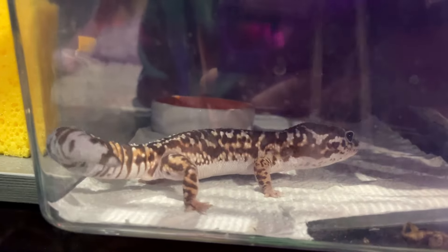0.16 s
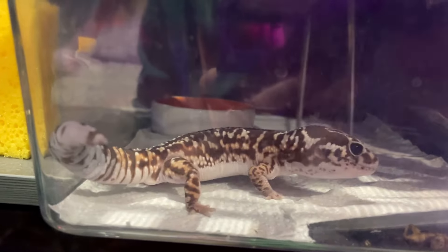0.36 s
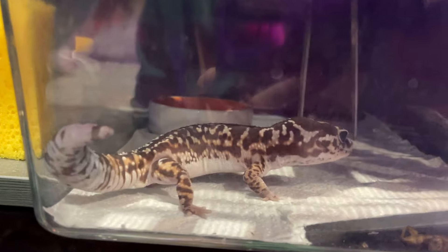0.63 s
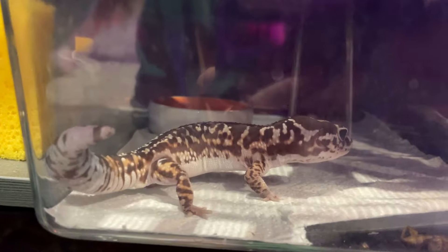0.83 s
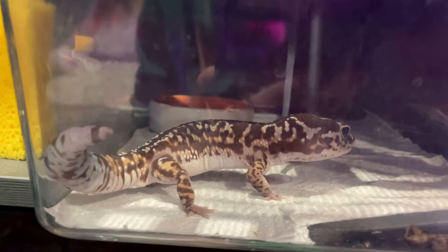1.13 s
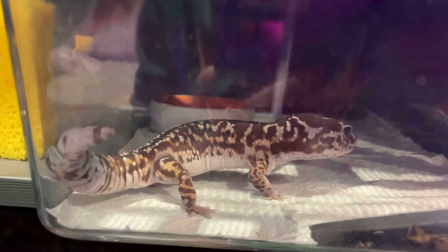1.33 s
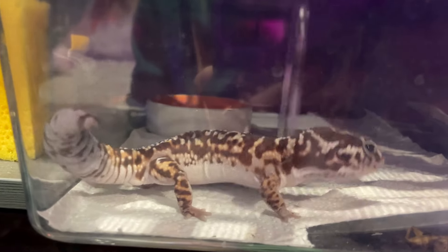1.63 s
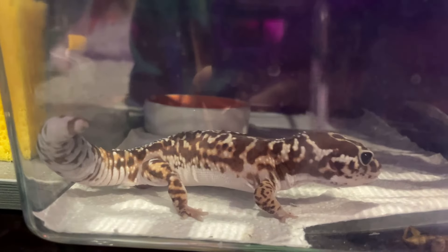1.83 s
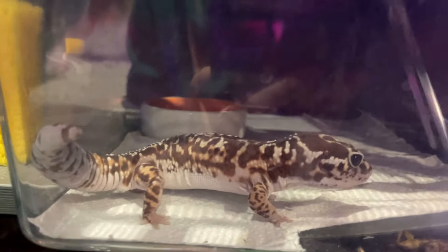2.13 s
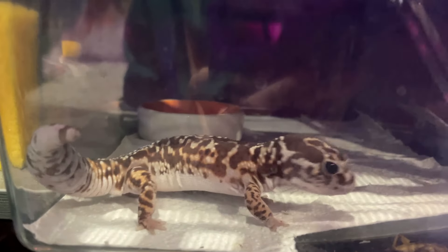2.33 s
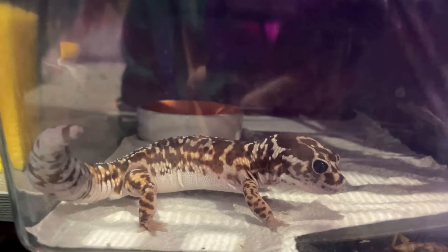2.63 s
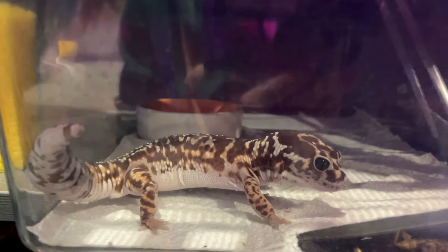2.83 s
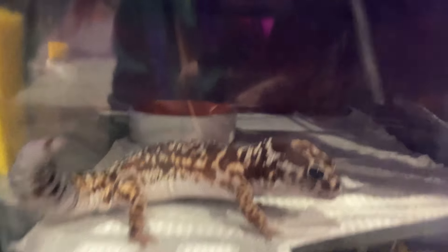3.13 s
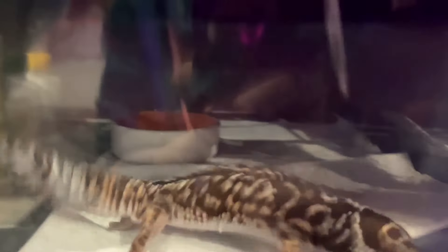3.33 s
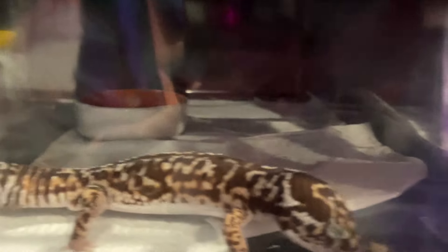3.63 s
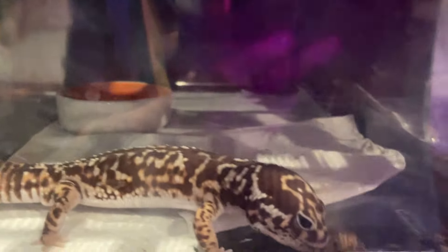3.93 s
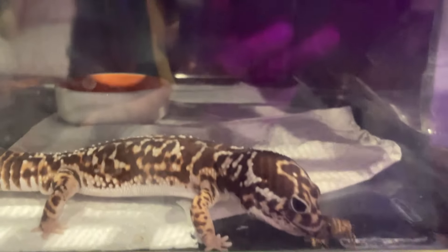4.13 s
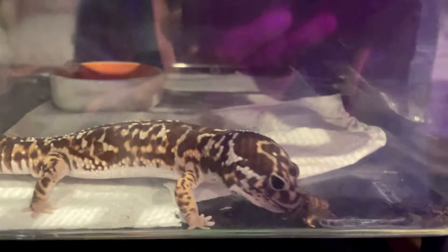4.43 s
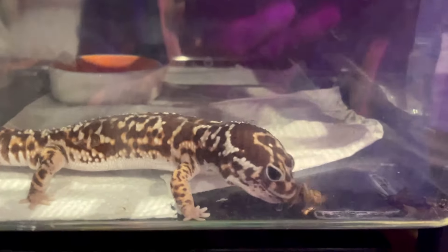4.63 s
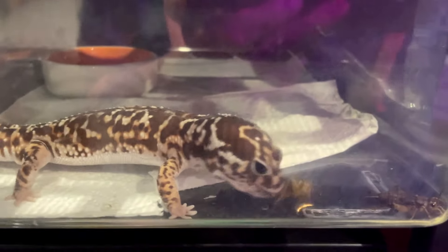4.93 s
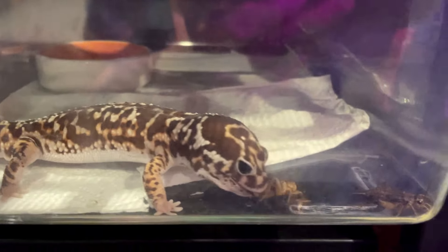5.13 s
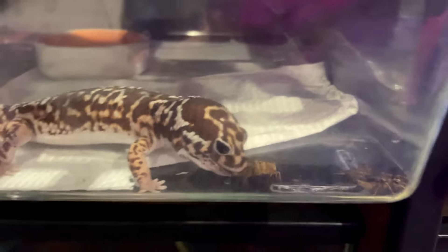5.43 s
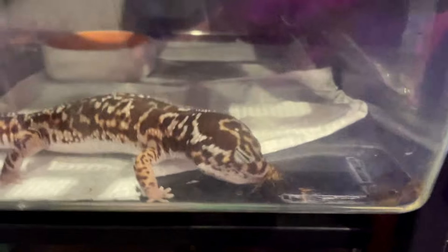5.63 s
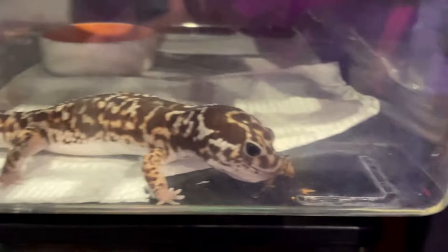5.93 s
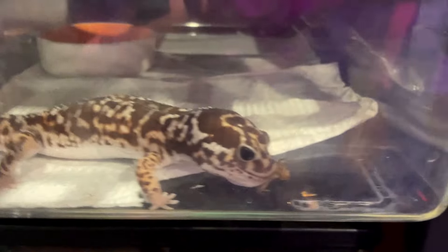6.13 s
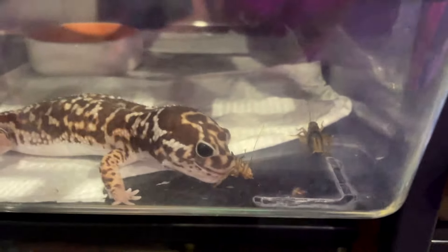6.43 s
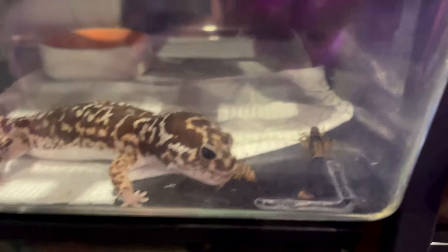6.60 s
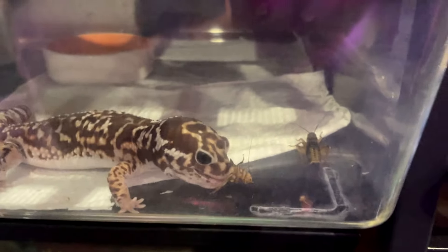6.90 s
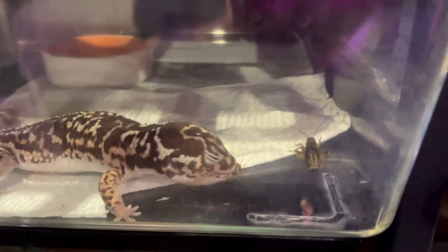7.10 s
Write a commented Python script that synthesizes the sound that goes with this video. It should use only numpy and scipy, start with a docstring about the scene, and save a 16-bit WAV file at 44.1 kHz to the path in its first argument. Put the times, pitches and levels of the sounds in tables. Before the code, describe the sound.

Scattered hollow knocks on a glass tank, light ticks and soft paper towel rustling as a lizard snaps at insects.

```python
"""A gecko stalks and snaps up crickets in a small glass tank, close to a stereo microphone.
Knocks, two of them the gecko's strikes, flex the walls, which boom, ring and judder; claws, jaws and
cricket legs tick on the floor. Feet and belly rustle the paper towel lining; something slides softly.
Behind the tank lies a quiet room: low rumble, faint mains hum and a thin, far whine."""
import sys
import numpy as np
from scipy import signal
from scipy.fft import rfft, irfft, next_fast_len
from scipy.io import wavfile

SR = 44100
rng = np.random.default_rng(int(sys.argv[2]) if len(sys.argv) > 2 else 0)


def put_to_file(sound):
    """Save the sound as 16-bit audio at rate SR, in the file named by the first command-line argument."""
    columns = np.atleast_2d(sound).T  # one column per channel
    safe = np.clip(columns, -1, 1)
    whole_steps = np.round(safe * 32767)
    wavfile.write(sys.argv[1], SR, whole_steps.astype(np.int16))


N = 320166

# room tone behind the tank: f/Hz, relative density/dB
ROOM_TONE = [(12, -45), (20, -32.5), (48, -3.5), (101, -2), (163, -14), (198, -8), (277, -18.5),
             (485, -27.5), (825, -36), (1090, -34.5), (1330, -42), (2990, -45.5), (8640, -57),
             (12800, -44.5), (16000, -75)]
# likeness of the room tone in left and right: f/Hz, correlation
ROOM_TONE_LIKENESS = [(60, 0.83), (150, 0.71), (300, 0.35), (650, -0.15), (3000, -0.44), (7000, -0.16),
                      (12000, 0.34)]
# mains hum: f/Hz, level/dB
MAINS_HUM = [(100, -53), (200, -69.5), (250, -62)]
# reverberation of the room: f/Hz, t60/s
ROOM_DECAY = [(100, 0.32), (500, 0.2), (2000, 0.13), (6000, 0.039), (14000, 0.036)]
# the tank at the microphone's two ports: f/Hz, left lead/rad, left minus right/dB
MIC_IMAGE = [(60, 0, 2.3), (250, .25, 1.8), (600, .45, 2.6), (1300, -.4, 4), (2200, .7, 5.5),
             (4800, .9, 4.5), (6000, -1.4, 2), (8600, -3.1, 0), (11500, -4.8, 0), (13000, -6.1, 0)]
# treble colour of the ports: f/Hz, gain/dB
MIC_COLOUR = [(4000, -0.5), (5600, -3), (7200, 1.5), (8600, -0.5), (10300, 3.5), (12500, -2), (14000, -3),
              (16000, -15.5)]
# dull rubs: middle t/s, length/s, centre f/Hz, level/dB
RUBS = [(0.152, 0.32, 1750, -70), (0.605, 0.21, 1640, -70), (0.588, 0.11, 740, -63.5),
        (1.531, 0.077, 826, -55.5), (1.616, 0.12, 1540, -53), (1.69, 0.47, 324, -52),
        (1.927, 0.13, 520, -57.5), (2.346, 0.044, 1070, -58), (2.698, 0.053, 606, -57)]
# feet, belly and insect shell on paper: peak t/s, length/s, crinkle level/dB, fizz level/dB
PAPER_STROKES = [(0.074, 0.14, -75.5, -69), (0.334, 0.16, -67, -59), (0.592, 0.66, -77, -68),
                 (1.211, 0.047, -70, -60.5), (1.282, 0.047, -95, -59), (1.377, 0.059, -90, -60),
                 (1.579, 0.095, -57.5, -47), (1.616, 0.082, -66, -59), (1.746, 0.2, -79, -62.5),
                 (2.056, 0.077, -76, -57.5), (2.295, 0.14, -75, -56.5), (2.423, 0.11, -70.5, -63),
                 (3.408, 0.1, -43, -39), (3.558, 0.24, -61.5, -57.5), (4.008, 0.04, -61.5, -60.5),
                 (4.04, 0.19, -78, -67), (4.339, 0.85, -80.5, -69.5), (5.507, 0.093, -58, -53.5),
                 (5.604, 0.098, -44, -44), (5.686, 0.45, -58, -53.5), (5.85, 0.3, -65, -63),
                 (5.996, 0.04, -60, -46), (6.032, 0.14, -48.5, -52), (6.127, 0.34, -54, -51.5),
                 (6.318, 0.28, -57, -54), (6.5, 0.29, -71.5, -62.5), (6.838, 0.28, -76, -63.5),
                 (7.221, 0.38, -73.5, -65.5)]
# hiss of the slide before the hardest knock: f/Hz, relative density/dB
SCRAPE_HISS = [(300, -13.5), (800, 3.5), (1150, 0.5), (1450, -15), (1900, -6), (2900, -14.5), (4250, -4.5),
               (5500, -15.5), (8600, -15.5), (10600, -5.5), (14500, -7.5)]
# squeaks within the slide: t/s, length/s, top f/Hz, level/dB
SCRAPE_SQUEAKS = [(3.102, .15, 386.3, -46), (3.22, .085, 543.4, -52.5)]
# something small hits the glass: t/s, level/dB
PING_HITS = [(6.0245, -27.5), (6.029, -35.5)]
# the modes it rings: f/Hz, level/dB, t60/s
PING_MODES = [(1700, -3, 0.05), (1985, -3, 0.16), (1850, -8, 0.05), (3050, -9, .04)]
# short dry resonant bursts, the clack of the knocks and a few separate light taps:
# t/s, level/dB, centre f/Hz, top f/Hz, decay/s, sharpness of the resonance
RESONANT_BURSTS = [(0.2695, -38, 850, 1300, 0.0092, 3), (0.274, -45.5, 1850, 3000, 0.014, 2.2),
                   (0.8735, -24.5, 720, 3180, 0.0066, 3), (0.947, -49.5, 1190, 2360, 0.0096, 1.9),
                   (1.613, -50, 2830, 5960, 0.012, 1.5), (2.211, -40.5, 3200, 3900, 0.0044, 1.5),
                   (2.399, -49.5, 597, 2400, 0.024, 1.7), (3.381, -14.5, 730, 3700, .013, 10),
                   (3.3804, -22, 1900, 3803, .005, 1.5), (3.598, -33, 850, 1250, .014, 3),
                   (3.984, -43.5, 1350, 3600, 0.0044, 7.9), (3.984, -53, 3080, 3680, 0.0044, 3.5),
                   (3.995, -50, 2300, 3700, 0.019, 1.1), (4.005, -53.5, 3200, 3750, 0.0096, 3),
                   (4.379, -45.5, 1180, 4050, 0.0035, 1.6), (6.083, -39, 979, 3400, 0.014, 8.5),
                   (6.083, -36.5, 2800, 3600, 0.0036, 2.5), (6.258, -34, 4196, 5670, 0.011, 2),
                   (6.259, -39, 1100, 2400, 0.021, 1.5), (6.333, -37.5, 950, 2190, 0.01, 1.3)]
# claws, jaws and cricket legs: t/s, length/s, level/dB, brightness/dB per band
CLAW_TICKS = [(0.334, .006, -72, 12), (0.705, .004, -73.5, 6.5), (1.171, 0.028, -61.5, -5),
              (1.434, .02, -71.5, -4), (2.763, .014, -80.5, -18.5), (3.426, .005, -39.5, -3.5),
              (3.499, .006, -57, -0.5), (4.707, .002, -78, 18), (5.472, .005, -62.5, 9.5),
              (5.641, .006, -52, -2.5), (5.769, .012, -58.5, 10.5), (5.805, .016, -54.5, 13.5),
              (5.8876, .005, -52, 8.5), (5.959, .008, -55, 2.5), (6.014, .014, -40, 3),
              (6.0835, .002, -43.5, 2), (6.238, .008, -58.5, 12.5), (6.256, .01, -38, 0),
              (6.332, .008, -57, 7.5), (6.384, .006, -62, 6.5), (7.129, .01, -69, 3)]
# colour common to all ticks: level/dB in clack, snap and fizz
TICK_BANDS_DB = [-4, 0.5, 3.5]
# something judders along the tank after a knock: t/s, length/s, level/dB, slip rate/Hz
JUDDER_RUNS = [(2.244, .034, -25, 200), (2.278, 0.061, -23, 216), (2.352, .048, -32, 150),
               (2.403, 0.06, -36, 200)]
# modes rattled by each slip: f/Hz, level/dB, t60/s
RATTLE_MODES = [(313, 0.5, 0.063), (543, -7, 0.044), (777, -9, 0.008), (1123, -14, 0.039),
                (1510, -25, 0.017), (1870, -23.5, 0.025), (2250, -25.5, 0.032), (3200, -27, 0.023)]
# modes of the glass tank: f/Hz, level/dB, t60/s
TANK_MODES = [(103, -15.5, 0.37), (139.3, -2.5, 0.37), (188.5, -8.5, 0.25), (228, -10, .2), (266, -7, 0.14),
              (304.5, -4.5, 0.12), (354.5, -6, 0.15), (453.5, -9, 0.26), (516.3, -7, 0.17),
              (639.4, -14.5, 0.16), (720, -2.5, 0.12), (770, -13.5, 0.05), (853, -16, 0.13),
              (936, -10, 0.19), (1127, -6.5, 0.14), (1227, -10, 0.17), (1456, -11, 0.097),
              (1612, -18, 0.087), (1663, -17.5, 0.13), (1855, -14, 0.29), (2000, -16.5, .11),
              (2120, -16, 0.08), (2695, -22, 0.07), (3100, -23, 0.097)]
# dense ringing of the tank: f/Hz, t60/s
CLATTER_DECAY = [(100, 0.66), (400, 0.19), (1500, 0.078), (4000, 0.023), (12000, 0.055)]
# knocks on the tank: t/s, level/dB, brightness/dB per band, fizz level/dB, thump f/Hz, slap f/Hz, # thump
# delay/s, ring length factor, ring level/dB
WALL_KNOCKS = [(0.2712, -35.3, -10.5, -81, 216.4, 331, 0.0014, 0.66, 0),
               (0.313, -45.5, -15, -79, 148, 324, 0.0076, 0.2, -3),
               (0.8726, -25, -9, -50, 213.5, 313.5, 0.0085, 0.55, -5),
               (0.945, -44.5, -13, -75, 145, 480, 0.014, 0.65, 0),
               (1.63, -52.5, -9.5, -61, 207, 325, 0.0015, 0.62, -8),
               (2.2135, -29.3, -10, -63, 206, 715, 0.008, 1.0, -15),
               (2.396, -49, -17, -74, 196, 623, 0.00548, 0.54, -2.5),
               (2.975, -46.5, -9.5, -90, 262, 506, 0.0045, 0.71, -3),
               (3.308, -39, -11.5, -80, 175, 574, 0.014, 1.5, -3.5),
               (3.379, -15.5, -3.5, -42.5, 269.9, 498, 0.0011, 0.56, -2),
               (3.598, -35, -8, -88, 139.7, 540, 0.01794, 0.86, -3.5),
               (3.842, -61.5, -14.5, -71.5, 156.8, 430, 0.0037, 1.35, -7.5),
               (5.591, -30, -12, -43, 146, 283, 0.0012, 0.67, -3.5),
               (6.257, -46.5, -2.5, -44, 165, 530, 0.0017, 1.13, -5),
               (6.321, -50.5, -1, -63, 254, 694, 0.0036, 1.26, -2.5)]
# colour common to all knocks: level/dB in bass, body, clack and snap
KNOCK_BANDS_DB = [-0.5, 1, -3, -10.5]
# crossovers between bass, body, clack, snap and fizz: f/Hz
CROSSOVERS_HZ = (250, 800, 2500, 7000)


def amp(db):
    """Decibels to gain."""
    return np.exp(np.asarray(db) * (np.log(10) / 20))


def unit(x):
    """Scales to rms 1."""
    return x / np.sqrt(np.mean(x ** 2) + 1e-24)


def read(points, hz, column=1):
    """Reads one column of a table over log frequency."""
    table = np.transpose(points)
    return np.interp(np.log(hz + 1), np.log(table[0] + 1), table[column])


def add(mix, s, sound):
    """Adds a sound to the mix at time s."""
    part = mix[..., max(round(s * SR), 0):][..., :sound.shape[-1]]
    part += sound[..., :part.shape[-1]]


def shaped(x, gain):
    """Filters by a gain given as a function of frequency."""
    size = x.shape[-1]
    padded = next_fast_len(size + 2048)
    return irfft(rfft(x, padded) * gain(np.fft.rfftfreq(padded, 1 / SR)), padded)[..., :size]


def rolloff(f, edge_hz, order):
    """Gain of 1 at zero that falls to a half at edge_hz."""
    return 1 / (1 + (f / edge_hz) ** order)


def resonance(f, hz, sharpness):
    """Gain of one peak, symmetric in log frequency."""
    return 1 / (1 + (sharpness * np.log((f + 1) / hz)) ** 2)


def bands(x):
    """Splits into bass, body, clack, snap and fizz, which sum to the whole."""
    below = [shaped(x, lambda f: rolloff(f, edge, 8)) for edge in CROSSOVERS_HZ]
    return np.diff([0 * x] + below + [x], axis=0)


def tilted(shape_db, db, brightness_db):
    """Band levels of a blow: harder contact tips them towards the treble, about the second band."""
    return db + np.array(shape_db) + brightness_db * (np.arange(len(shape_db)) - 1)


def voiced(x, band_db, size):
    """Colours a blow: sets the levels of the topmost bands over the first size samples, drops the rest."""
    parts = bands(x)[-len(band_db):]
    return sum(amp(db) * part / np.sqrt(np.mean(part[:, :size] ** 2) + 1e-24)
               for db, part in zip(band_db, parts))


def mic_noise(size, apart):
    """Noise at the two microphone ports: a shared part and some of their own."""
    noise = rng.standard_normal((3, size))
    return unit(noise[0] + apart * noise[1:])


def drift(size, rate_hz):
    """Random wander of rms 1."""
    return unit(shaped(rng.standard_normal(size), lambda f: rolloff(f, rate_hz, 4)))


def dying(noise, t60s):
    """Lets each frequency of a noise die at its own speed."""
    hz, t, spectrum = signal.stft(noise, SR, nperseg=256)
    fade = amp(-60 * t / read(t60s, hz)[:, None])
    return signal.istft(spectrum * fade, SR, nperseg=256)[1][..., :noise.shape[-1]]


def ringing(modes, t, spread_db, stretch=1, lag_s=0, detune=0):
    """Damped modes, weighted and detuned at random as the place of a blow would do."""
    hz, db, t60 = np.transpose(modes)[:, :, None]
    strength, shift = rng.standard_normal((len(hz), 2)).T[:, :, None]
    hz = hz * (1 + detune * shift * hz / (hz + 300))
    age = np.maximum(t - lag_s * np.sqrt(100 / hz), 0)  # slow bending waves bring low modes late
    weight = amp(db + spread_db * strength) * (-1) ** np.arange(len(hz))[:, None]
    return (weight * amp(-60 * age / (t60 * stretch)) * np.sin(2 * np.pi * hz * age)).sum(0)


def fibres(size, grain_db=1.0, clump_db=2.0):
    """Friction noise: countless tiny slips that come in clumps."""
    noise = mic_noise(size, apart=0.051)
    return noise * amp(grain_db * drift(size, rate_hz=590) + clump_db * drift(size, rate_hz=41))


def room_tone(air_db=-48.5, lumpy_db=2.0, swell_db=12.5, swell_s=2.7, waver_db=2.5):
    """Behind the tank: lumpy rumble, even hiss, mains hum and a far whine that swells, then holds."""
    t = np.arange(N) / SR
    left, spare = rng.standard_normal((2, N))
    likeness = lambda f: read(ROOM_TONE_LIKENESS, f)
    right = shaped(left, likeness) + shaped(spare, lambda f: np.sqrt(1 - likeness(f) ** 2))
    colour = lambda f: amp(read(ROOM_TONE, f)) / np.sqrt(1.4 + likeness(f))
    air = amp(air_db) * unit(shaped(np.array([left, right]), colour))
    rumble = shaped(air, lambda f: rolloff(f, 300, 4))
    air += rumble * (amp(lumpy_db * drift(N, rate_hz=8.4)) - 1)
    hum = sum(amp(db) * np.sin(2 * np.pi * (hz * t + rng.random())) for hz, db in MAINS_HUM)
    whine = unit(shaped(rng.standard_normal((2, N)), lambda f: rolloff(f - 1085, 28, 2)))
    whine_db = -72 - swell_db * np.maximum(1 - t / swell_s, 0) + waver_db * drift(N, rate_hz=2.5)
    return (air + hum + whine * amp(whine_db)) * amp([[1], [-1]])  # a little to the left


def room_tail(x, wet_db=-17, build_s=0.0097):
    """Diffuse reverberation, weak this close to the tank and different at each port."""
    t = np.arange(SR // 2) / SR
    tail = dying(mic_noise(len(t), apart=1.0), ROOM_DECAY) * (1 - np.exp(-(t / build_s) ** 2))
    return amp(wet_db) * signal.fftconvolve(x, tail / np.linalg.norm(tail[0]), axes=1)[:, :N]


def microphone(x):
    """The two ports colour the treble and hear the tank with different phase and strength."""
    def gain(hz):
        lead, balance_db = read(MIC_IMAGE, hz), read(MIC_IMAGE, hz, column=2)
        balance = amp([balance_db / 2, -balance_db / 2])
        strength = balance / np.sqrt(np.mean(balance ** 2, 0)) * amp(read(MIC_COLOUR, hz))
        return strength * np.exp(-1j * np.array([0 * lead, lead]))
    return shaped(x, gain)


def shuffles(sharpness=2.4):
    """Soft rubs swell and fade, each in one broad resonance."""
    out = np.zeros((2, N))
    for s, length, hz, db in RUBS:
        size = int(length * SR)
        rub = shaped(fibres(size), lambda f: resonance(f, hz, sharpness) ** 1.09)
        add(out, s - length / 2, amp(db) * unit(rub) * np.hanning(size))
    return out


def paper_rustle(stir_db=-84, crackle_db=9, crackles_per_s=130, rise_share=0.65, fade_db=23):
    """Strokes over the paper swell and fade above a faint stir: crinkle, stray crackles, fine fizz."""
    t = np.arange(N) / SR
    impulses = amp(crackle_db) * rng.standard_normal(N) * (rng.random(N) < crackles_per_s / SR)
    crackles = signal.fftconvolve(impulses, rng.standard_normal(128) * np.exp(-t[:128] / 0.0004))[:N]
    paper = shaped(fibres(N) + crackles, lambda f: rolloff(f, 14300, 24))
    _, body, clack, snap, fizz = map(unit, bands(paper))
    crinkle = amp(-6) * body + amp(-2) * clack + snap
    power = np.full((2, N), amp(stir_db) ** 2)
    for s, length, crinkle_db, fizz_db in PAPER_STROKES:
        from_peak = np.maximum((s - t) / rise_share, t - s) / length
        power += (amp([[crinkle_db], [fizz_db]]) * amp(-fade_db * np.minimum(from_peak, 10))) ** 2
    crinkle_level, fizz_level = np.sqrt(power)
    return crinkle_level * crinkle + fizz_level * fizz


def scrape(start_s=3.05, length_s=0.35, edge_s=0.079, level_db=-59, whistle_hz=4260, pitch_arch=0.21):
    """A light slide hisses, whistles softly and squeaks faintly where it catches."""
    out, t = np.zeros((2, N)), np.arange(0, length_s, 1 / SR)
    hiss = unit(shaped(fibres(N)[:, :len(t)], lambda f: amp(read(SCRAPE_HISS, f))))
    whistle = unit(shaped(mic_noise(len(t), apart=0.4), lambda f: rolloff(f - whistle_hz, 190, 2)))
    edges = np.minimum(np.minimum(t, length_s - t) / edge_s, 1)
    add(out, start_s, amp(level_db) * (hiss + amp(-10) * whistle) * edges)
    for s, length, top_hz, db in SCRAPE_SQUEAKS:
        speed = np.sin(np.pi * np.arange(0, length, 1 / SR) / length)
        unsteady = 1 + 0.045 * drift(N, rate_hz=120)[:len(speed)]
        hz = top_hz * (1 - pitch_arch * (1 - speed)) * unsteady
        phase = 2 * np.pi * np.cumsum(hz) / SR
        add(out, s, amp(db) * speed * (np.sin(phase) + amp(-16.5) * np.sin(2 * phase)))
    return out


def glass_ping(scratch_db=-5, scratch_s=0.015):
    """Two quick scratchy blows ring a few high modes of the glass."""
    out, t = np.zeros(N), np.arange(8192) / SR
    for s, db in PING_HITS:
        ring = ringing(PING_MODES, t, spread_db=1)
        scratch = unit(shaped(rng.standard_normal(len(t)), lambda f: rolloff(f - 1900, 600, 2)))
        add(out, s, amp(db) * (ring + amp(scratch_db) * scratch * np.exp(-t / scratch_s)))
    return out


def clacks(rise_s=0.00073):
    """The clack of the knocks and a few separate light taps: short dry bursts, each in one resonance."""
    out, t = np.zeros((2, N)), np.arange(4096) / SR
    for s, db, hz, top_hz, decay_s, sharpness in RESONANT_BURSTS:
        colour = lambda f: resonance(f, hz, sharpness) * rolloff(f, top_hz, 20)
        fade = np.exp(-t / decay_s)
        burst = shaped(mic_noise(len(t), apart=0.54), colour) * fade * np.minimum(t / rise_s, 1)
        add(out, s, amp(db) * unit(burst) * np.sqrt(np.mean(fade ** 2)))
    return out


def ticks(snaps_per_s=900, snap_t60=0.053, glass_db=-26):
    """Claws, jaws and cricket legs: a first snap and a short random cluster ring the glass faintly."""
    out, t = np.zeros((2, N)), np.arange(8192) / SR
    high_modes = [mode for mode in TANK_MODES if mode[0] > CROSSOVERS_HZ[1]]
    spike = 0.43 * np.exp(-t / 0.00051)
    for s, length, db, brightness_db in CLAW_TICKS:
        chance, strength = rng.random(len(t)), rng.standard_normal(len(t))
        cluster = strength * (chance < snaps_per_s / SR) * (t < length)
        cluster[0] = 1.5  # the first snap
        snap = mic_noise(len(t), apart=0.4) * (amp(-60 * t / snap_t60) + spike)
        snap += amp(glass_db) * ringing(high_modes, t, spread_db=4, stretch=0.3)
        tick = signal.fftconvolve(snap, cluster[None])[:, :len(t)]
        add(out, s, voiced(tick, tilted(TICK_BANDS_DB, db, brightness_db), size=1102))
    return out


def judder(rattle_db=-13, uneven_db=5, sag=0.14, jolt_db=5.5, jolt_s=0.011, fade_db=1, edge_s=0.0032):
    """Stick and slip shakes the wall, jolting at first and slowing to rest; each slip rattles."""
    out, ring_t = np.zeros((2, N)), np.arange(4096) / SR
    for s, length, db, slip_hz in JUDDER_RUNS:
        t = np.arange(0, length, 1 / SR)
        stopping = (t / length) ** 3
        unsteady = 1 + 0.06 * drift(N, rate_hz=70)[:len(t)]
        cycles = np.cumsum(slip_hz * (1 - sag * stopping) * unsteady) / SR
        level = amp(db + jolt_db * np.exp(-t / jolt_s) - fade_db * stopping)
        edges = np.minimum(np.minimum(t, length - t) / edge_s, 1)
        add(out, s, level * edges * np.sin(2 * np.pi * cycles))
        slips = np.flatnonzero(np.diff(np.floor(cycles), prepend=-1))
        for at, strength in zip(slips, rng.standard_normal(len(slips))):
            hit = ringing(RATTLE_MODES, ring_t, spread_db=4, detune=0.03)
            add(out, s + t[at], level[at] * amp(rattle_db + uneven_db * np.tanh(strength)) * hit)
    return out


def wall_flex(t, hz, swell_s):
    """A few cycles that swell and die as the wall gives under a blow."""
    age = np.maximum(t, 0)
    return age / swell_s * np.exp(1 - age / swell_s) * np.sin(2 * np.pi * hz * age)


def knocks(thump_db=4, slap_db=2, clatter_db=-5, crack_db=-4, crack_s=0.015, contact_hz=3700):
    """Knocks on the tank, two of them the gecko's strikes: crack, slap, thump, then ring and clatter."""
    out, t = np.zeros((2, N)), np.arange(SR // 3) / SR
    onset = 1 - np.exp(-t / 0.003)
    # the contact lasts a moment, so little is left above contact_hz
    blunt = lambda f: f / (f + 80) * rolloff(f, 1100, 1) * (0.2 + rolloff(f, contact_hz, 8))
    for s, db, brightness_db, fizz_db, thump_hz, slap_hz, delay, stretch, ring_db in WALL_KNOCKS:
        thump = amp(thump_db) * wall_flex(t - delay, thump_hz, swell_s=0.0055)
        slap = amp(slap_db) * wall_flex(t - delay / 4, slap_hz, swell_s=2 / slap_hz)
        walls = np.array([
            ringing(TANK_MODES, t, spread_db=3.5, stretch=stretch, lag_s=delay + 0.0031, detune=0.009)
            for _ in range(3)])
        ring = amp(ring_db) * (walls[0] + 0.6 * walls[1:])  # the ports share one wall and have one each
        noise = unit(shaped(mic_noise(len(t), apart=0.6), blunt))
        clatter = amp(clatter_db) * dying(noise, CLATTER_DECAY)
        crack = amp(crack_db) * noise * np.exp(-t / crack_s)
        knock = thump + slap + (ring + clatter + crack) * onset
        band_db = [*tilted(KNOCK_BANDS_DB, db, brightness_db), fizz_db]
        add(out, s, voiced(knock, band_db, size=2205))
    return out


def scene():
    """The tank close to the microphone, with the room behind it."""
    tank = knocks() + judder() + ticks() + clacks() + glass_ping() + scrape() + paper_rustle() + shuffles()
    low_cut = signal.butter(2, 48, "highpass", fs=SR, output="sos")  # little below 48 Hz reaches the microphone
    close = signal.sosfilt(low_cut, microphone(tank))
    return close + room_tail(close) + room_tone()


def record(dry):
    """The recorder clips at full scale and rolls the treble off into its band limit."""
    heard = shaped(np.clip(dry, -1, 1), lambda f: rolloff(f, 15000, 36))
    band_limit = signal.firwin(401, 15900, window=("kaiser", 8), fs=SR)
    return signal.oaconvolve(heard, band_limit[None], "same")


dry = scene()
out = record(dry)
put_to_file(out)
```